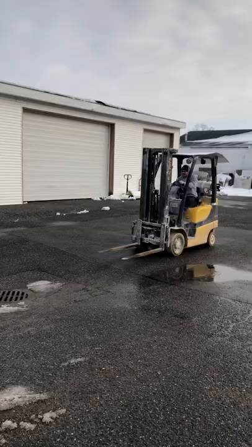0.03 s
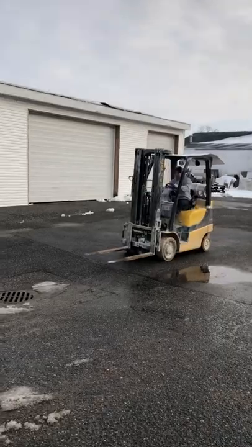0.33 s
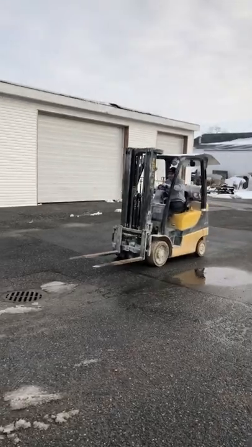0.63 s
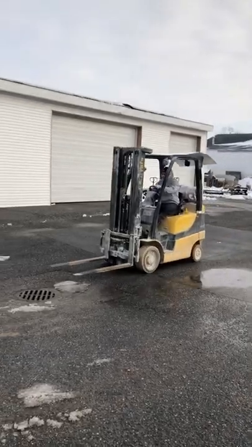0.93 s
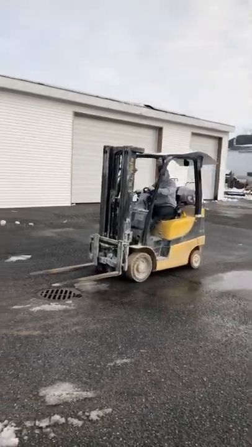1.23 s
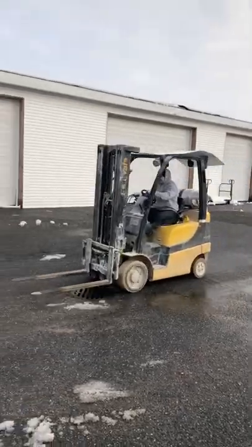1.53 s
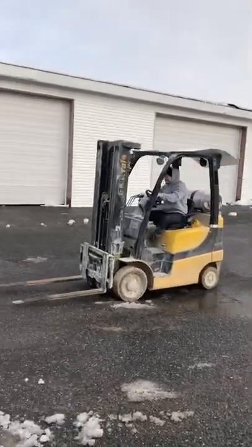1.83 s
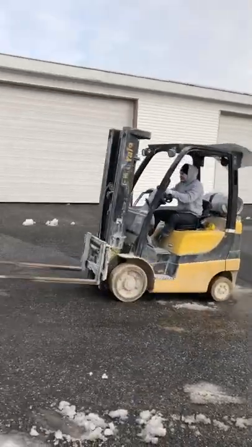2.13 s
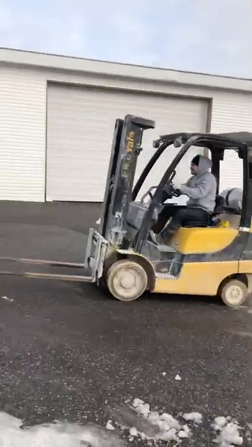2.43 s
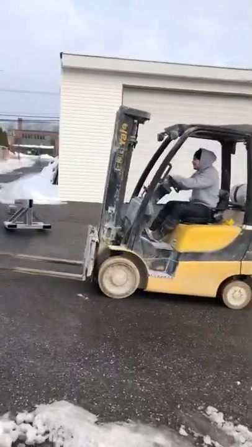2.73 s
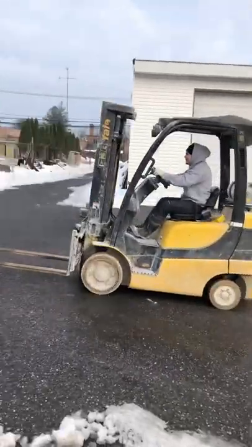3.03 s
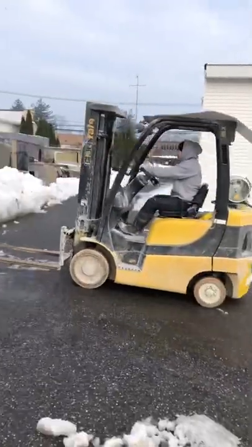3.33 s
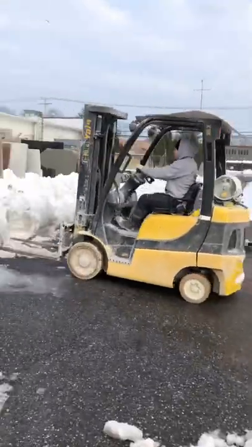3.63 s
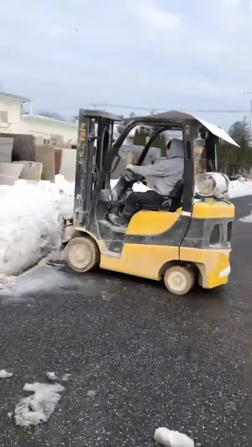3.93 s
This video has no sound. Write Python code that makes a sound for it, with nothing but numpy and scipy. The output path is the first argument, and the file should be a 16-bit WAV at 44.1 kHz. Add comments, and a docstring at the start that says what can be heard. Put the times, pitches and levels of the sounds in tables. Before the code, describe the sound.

A forklift pulls away outdoors with a low engine drone and a faint rising whine in the first second. The engine climbs in pitch and grows louder over a soft hiss of wet tyres. From about 1.4 to 3 seconds, steel forks and chains clatter and clink loudly. It passes close, revving higher around 3.5 seconds, with the metal still jiggling lightly until 4 seconds.

```python
"""A gas forklift pulls away across a paved yard, its transmission whining faintly, tyres hissing on wet grit.
The engine speeds up and grows louder: the exhaust drones at the firing rate, the belt-driven fan hums
and rushes. From about 1.4 s to 3 s the hard tyres cross a drain and rough asphalt; forks, carriage and
mast chains clatter, echoing off ground and shed wall. It passes close by, revving, steel still jiggling."""
import sys
import numpy as np
from scipy import signal
from scipy.fft import rfft, irfft
from scipy.io import wavfile

SR = 44100
rng = np.random.default_rng(int(sys.argv[2]) if len(sys.argv) > 2 else 0)


def log_audio(samples):
    """Write samples as a 16-bit WAV file to the path given in sys.argv[1]."""
    # one column per channel
    frames = np.atleast_2d(samples).T
    # limit to full scale, then quantise
    limited = np.clip(frames, -1, 1)
    pcm = np.round(limited * 32767).astype(np.int16)
    wavfile.write(sys.argv[1], SR, pcm)


N = 176400
TIME = np.arange(N) / SR


def from_db(db):
    """Decibels to gain."""
    return 10 ** (np.asarray(db) / 20)


def rms_one(x):
    """Scale to unit rms."""
    return x / np.sqrt(np.mean(x ** 2) + 1e-20)


def in_time(rows, column=1):
    """One column of a curve at every sample."""
    rows = np.array(rows)
    return np.interp(TIME, rows[:, 0], rows[:, column])


def drift(rate_hz):
    """Slow random wander, rms 1."""
    step, settle = 40, 2000
    pole = np.exp(-2 * np.pi * step * rate_hz / SR)
    noise = rng.standard_normal(N // step + settle + 2)
    slow = signal.lfilter([1], [1, -2 * pole, pole * pole], noise)[settle:]
    return np.interp(np.arange(N) / step, np.arange(len(slow)), rms_one(slow))


def colour(x, spectrum):
    """Shape a spectrum, keeping the power of white input."""
    hz, db = np.transpose(spectrum)
    bin_hz = np.maximum(np.arange(N + 1) * SR / (2 * N), 1)
    rolloff = np.minimum(bin_hz / hz[0], 1) * np.minimum(hz[-1] / bin_hz, 1)
    gain = from_db(np.interp(np.log(bin_hz), np.log(hz), db)) * rolloff ** 2
    return irfft(rfft(x, 2 * N) * rms_one(gain))[:N]


def contacts(per_s, spread_db):
    """Random clicks of uneven size, rms 1."""
    sizes = from_db(spread_db * np.minimum(rng.exponential(1, N), 4))
    signs = rng.choice([-1, 1], N)
    return rms_one(sizes * signs * (rng.random(N) < per_s / SR))


def ring(x, hz, t60_s):
    """One mode, keeping the power of white input."""
    radius = np.exp(-np.log(1000) / (t60_s * SR))
    angle = 2 * np.pi * hz / SR
    gain = np.sin(angle) * np.sqrt(2 * (1 - radius * radius))
    return signal.lfilter([0, gain], [1, -2 * radius * np.cos(angle), radius * radius], x + 1e-18)


def tone(phase, level_db, flutter_db, wobble_rad):
    """Machine tone of given rms level, fluttering in level and phase."""
    amplitude = np.sqrt(2) * from_db(level_db + flutter_db * drift(14.3))
    return amplitude * np.cos(phase + wobble_rad * drift(10.3))


def bursts(rows, fade_s):
    """Envelope of instant onsets and exponential fades."""
    return sum(from_db(db) * (TIME >= start) * np.exp(-np.abs(TIME - start) / fade_s)
               for start, db in rows)


# delay_s, level_db
YARD_ECHOES = [(.007, -23.5), (.047, -22.5)]

def yard(x, cutoff_hz=5000):
    """Direct sound plus dull echoes off ground and shed."""
    dull = signal.sosfilt(signal.butter(1, cutoff_hz, fs=SR, output="sos"), x)
    return x + sum(from_db(db) * np.interp(TIME - delay, TIME, dull, left=0) for delay, db in YARD_ECHOES)


# time_s, level_db
WHISTLE_LEVEL = [(0, -56), (.4, -50), (.9, -60)]

def whistle():
    """Faint airy whistle while pulling away."""
    return from_db(in_time(WHISTLE_LEVEL)) * ring(rng.standard_normal(N), hz=2170, t60_s=.018)


# time_s, pitch_hz, level_db
GEAR_WHINE = [(0, 230.7, -43), (.25, 283, -47), (.5, 333.7, -38.5), (.9, 391, -48.5), (1.3, 418, -70)]

def transmission():
    """Gear whine rising with road speed."""
    phase = 2 * np.pi * np.cumsum(in_time(GEAR_WHINE)) / SR
    return tone(phase, in_time(GEAR_WHINE, column=2), flutter_db=2, wobble_rad=.4)


# start_s, level_db
GRIT_SNAP = [(.501, -28)]
# freq_hz, gain_db
SNAP_SPECTRUM = [(3500, -18), (6500, 3), (8500, -2), (14000, -16)]

def grit_snap():
    """Grit crushed under a tyre: one tiny bright burst."""
    return colour(bursts(GRIT_SNAP, fade_s=0.0023) * rng.standard_normal(N), SNAP_SPECTRUM)


# time_s, level_db
HISS_LEVEL = [(0, -41.5), (.5, -39), (1.1, -37), (1.5, -34), (2.2, -33), (2.9, -31.5), (3.35, -30),
              (3.7, -29), (4, -34.5)]
# freq_hz, gain_db
HISS_SPECTRUM = [(900, -14), (2000, 0.5), (3200, -1), (5000, -1.5), (7500, -1), (10000, -6), (15500, -11)]

def hiss(firing_phase, throb=0.17, grit=0.77):
    """Engine bay and tyres on wet asphalt hiss; wet grit crackles."""
    smooth = rng.standard_normal(N) * (1 + throb * np.cos(firing_phase))
    crackle = grit * contacts(per_s=3000, spread_db=1.5)
    return colour(rms_one(smooth + crackle), HISS_SPECTRUM) * from_db(in_time(HISS_LEVEL))


# time_s, level_db
RUSH_LEVEL = [(0, -35), (.5, -35.5), (1, -31), (1.4, -30.5), (2, -22), (2.8, -23.5), (3.35, -25),
              (3.7, -21.5), (4, -24)]
# freq_hz, gain_db
RUSH_SPECTRUM = [(60, -24), (130, 0.5), (200, 3), (340, -3), (540, 2), (800, -0.5), (950, -2.5), (1280, -1),
                 (2000, -13), (4000, -37), (16000, -41)]

def rush(firing_phase, throb=0.078, flicker_db=1.3):
    """Engine and fan noise, throbbing with each firing."""
    air = rng.standard_normal(N) * (1 + throb * np.cos(firing_phase))
    return colour(air, RUSH_SPECTRUM) * from_db(in_time(RUSH_LEVEL) + flicker_db * drift(23))


# time_s, level_db
BLADE_LEVEL = [(0, -38), (.5, -32.5), (1, -30.5), (1.5, -25.5), (1.9, -35), (2.3, -24.5), (3.1, -24.5),
               (3.7, -21), (4, -20)]
# blade_rate_multiple, offset_db
BLADE_HARMONICS = [(2, -16), (3, -15)]

def fan(firing_phase, blades_per_firing=23 / 8):
    """Blade tone and harmonics, out of step with the firings because of the belt."""
    phase = blades_per_firing * firing_phase
    level_db = in_time(BLADE_LEVEL)
    hum = tone(phase, level_db, flutter_db=.8, wobble_rad=.1)
    return hum + sum(tone(multiple * phase, level_db + offset_db, flutter_db=2, wobble_rad=0.74)
                     for multiple, offset_db in BLADE_HARMONICS)


# Exhaust harmonics 1, 2, 4: time_s, level_db
DRONE_LEVEL = [(0, -37.5), (.48, -34), (.6, -39), (.8, -31), (1.1, -23.5), (1.56, -21), (1.7, -33.5),
               (2.05, -20.5), (2.5, -19), (3.3, -18), (3.65, -20), (4, -23.5)]
OCTAVE_LEVEL = [(0, -41), (.75, -33), (1.1, -46), (1.5, -37.5), (1.9, -30), (3.1, -34), (3.55, -24.5),
                (4, -57)]
FOURTH_LEVEL = [(0, -50), (.85, -38), (1.2, -46.5)]
# firing_rate_multiple, level_re_rush_db
WEAK_ORDERS = [(3, -12), (7, -23), (8, -14)]

def exhaust(firing_phase):
    """Firing pulses make a drone, its octave and rougher upper orders."""
    drone = tone(firing_phase, in_time(DRONE_LEVEL), flutter_db=1, wobble_rad=.04)
    octave = tone(2 * firing_phase, in_time(OCTAVE_LEVEL), flutter_db=2, wobble_rad=0.28)
    fourth = tone(4 * firing_phase, in_time(FOURTH_LEVEL), flutter_db=1, wobble_rad=0.71)
    rush_db = in_time(RUSH_LEVEL)
    weak = sum(tone(multiple * firing_phase, rush_db + db, flutter_db=4, wobble_rad=0.68)
               for multiple, db in WEAK_ORDERS)
    return drone + octave + fourth + weak


KNOCK_RISE_S, KNOCK_FADE_S, CONTACTS_PER_S = 0.00083, 0.019, 1500
# start_s, pitch_hz, level_db, t60_s
STEEL_PINGS = [(1.745, 4580, -10, 0.049), (1.746, 9350, -20.5, 0.16), (2.221, 3772, -25, 0.75),
               (2.358, 6970, -20, 0.11), (2.506, 1798, -13, 0.34), (2.641, 5280, -20, 0.16),
               (2.931, 3224, -22, 0.63)]

def pings():
    """Cleanly struck chain links and fork tips ring out."""
    out = np.zeros(N)
    for start, hz, db, t60_s in STEEL_PINGS:
        age = np.maximum(TIME - start, 0)
        envelope = (1 - np.exp(-age / KNOCK_RISE_S)) * np.exp(-np.log(1000) * age / t60_s)
        out += from_db(db) * envelope * np.sin(2 * np.pi * hz * age)
    return out


# start_s, level_db
FORK_SLAMS = [(1.667, -11), (1.745, -11), (1.793, -14.5), (2.236, -19), (2.506, -11)]

def fork_slams(clink_db=-2):
    """A fork hits its stop with dry, hard cracks."""
    force = bursts(FORK_SLAMS, fade_s=0.0055)
    clank = colour(force * rng.standard_normal(N), CLANK_SPECTRUM)
    clink = colour(force * rng.standard_normal(N), CLINK_SPECTRUM)
    return clank + from_db(clink_db) * clink


def loose_parts(starts_s, levels_db, range_hz, t60_s, count):
    """Each knock rings a few parts at random pitches, the higher the weaker."""
    out, age = np.zeros(N), TIME[:SR // 4]
    for start, db in zip(starts_s, levels_db):
        hz = np.exp(rng.uniform(*np.log(range_hz), (count, 1)))
        lag_s = rng.uniform(0, KNOCK_FADE_S / 2, (count, 1))
        since = np.maximum(age - lag_s, 0)
        envelope = np.sqrt(range_hz[0] / hz) * np.exp(-np.log(1000) * since / t60_s)
        rings = envelope * np.sin(2 * np.pi * hz * since)
        i = int(start * SR)
        out[i:i + len(age)] += from_db(db) * rings.sum(axis=0)[:N - i]
    return out


def brackets_and_chains():
    """Carriage brackets clang and chain links jingle at each fork knock."""
    starts_s, level_db, _, clink_offset_db = np.transpose(FORK_KNOCKS)
    brackets = loose_parts(starts_s, level_db - 12, range_hz=(1147, 3022), t60_s=.11, count=4)
    links = loose_parts(starts_s, level_db + clink_offset_db - 7, range_hz=(2540, 12850), t60_s=.15, count=8)
    return brackets + links


def rattle(force, t60_s=0.031, tail_db=-1.5):
    """Uneven contacts, then the dense after-ring of many small parts."""
    pole = np.exp(-2 * np.log(1000) / (t60_s * SR))
    tail = np.sqrt(signal.lfilter([1 - pole], [1, -pole], force ** 2))
    hits = force * contacts(CONTACTS_PER_S, spread_db=1)
    return hits + from_db(tail_db) * tail * rng.standard_normal(N)


def struck_mode(force, hz, t60_s, uneven_db=4, pitch_spread=0.0212):
    """Three like parts, unevenly struck, ring at slightly different pitches."""
    detune = pitch_spread * (np.arange(3) - 1 + rng.uniform(-0.63, 0.74, 3)) / 2
    out = np.zeros(N)
    for part_hz in hz * (1 + detune):
        hits = force * from_db(uneven_db * drift(13)) * contacts(CONTACTS_PER_S, spread_db=4.5)
        out += ring(hits, part_hz, t60_s)
    return out / np.sqrt(3)


# time_s, level_db
JIGGLE_LEVEL = [(0, -59), (1.3, -44), (1.55, -28.5), (1.7, -23.5), (1.92, -25.5), (2.1, -20.5),
                (2.6, -20.5), (2.8, -27), (3.3, -29), (3.7, -26), (4, -26)]

def shaking(starts_s, levels_db, jiggle_db):
    """Force envelope: knocks swell and fade over the steady jiggling of chains and forks."""
    power = from_db(in_time(JIGGLE_LEVEL) + jiggle_db) ** 2
    age = TIME[:SR // 4]
    knock = (1 - np.exp(-age / KNOCK_RISE_S)) * np.exp(-age / KNOCK_FADE_S)
    for start, db in zip(starts_s, levels_db):
        i = int(start * SR)
        power[i:i + len(age)] += (from_db(db) * knock[:N - i]) ** 2
    return np.sqrt(power)


# start_s, level_db, thud_offset_db, clink_offset_db
FORK_KNOCKS = [(1.449, -16.5, -8, -28), (1.484, -17.5, 1, -13.5), (1.5947, -11, -19, -18),
               (1.6425, -9, -10.5, -24), (1.6667, -5, -17, -15), (1.6863, -9, -11.5, -12.5),
               (1.701, -7.5, -24, -12), (1.715, -6.5, -6, -19), (1.741, -11.5, -6.5, -13),
               (1.7938, -9, -18, -14), (1.8491, -9.5, -17, -7.5), (1.867, -21, 5, 1),
               (1.9553, -7, -7.5, -15.5), (2.0224, -8.5, -9, -34), (2.051, -6.5, -13, -17),
               (2.0724, -9.5, 0, -8.5), (2.09, -10.5, -20, -8), (2.127, -11, -2, -8),
               (2.166, -6.5, -9.5, -18), (2.2164, -10, -25, -7.5), (2.2346, -21, 3, 6),
               (2.2953, -8.5, -19, -14.5), (2.3331, -10.5, -10, -10.5), (2.358, -6, -26, -10.5),
               (2.3714, -14, -19, -6.5), (2.4054, -14.5, 2.5, -8), (2.4376, -13, 1, -7.5),
               (2.503, -11, -19, -22), (2.582, -7, -6, -14.5), (2.605, -15, 4.5, -6),
               (2.6415, -8.5, -3.5, -12), (2.7777, -12, -5, -8), (2.9275, -14.5, -5.5, -12.5),
               (3, -15.5, -9, -7.5)]
# Steelwork registers: freq_hz, gain_db
THUD_SPECTRUM = [(30, -21), (150, -10), (340, -10), (490, 2), (640, -4.5), (850, -12.5), (1500, -25)]
CLANK_SPECTRUM = [(500, -20), (900, -9), (1200, 2), (1900, 1), (2600, -2.5), (3600, -10), (7000, -29)]
CLINK_SPECTRUM = [(1800, -46), (3400, 4.5), (4600, 1.5), (7500, -2), (10000, -12.5), (13500, -12.5),
                  (16000, -27)]
# Forks and mast: pitch_hz, level_db, t60_s
STEEL_MODES = [(494, -12, 0.59), (627, -9.5, 0.22), (981, -14, 0.6), (1185, -11, 0.14), (1800, -15, 0.3),
               (3227, -9, 0.23), (3767, -10.5, 0.39), (4440, -10, 0.35), (5264, -8, 0.22), (6950, -9, 0.13),
               (9140, -11, 0.076), (13800, -21, .1)]

def forks(thud_db=-2.5, clank_db=-8, clink_db=-2, ring_db=-2, clink_above_hz=3000):
    """Forks knock in the carriage: steel contacts sound three registers and ring the modes."""
    starts_s, level_db, thud_offset_db, clink_offset_db = np.transpose(FORK_KNOCKS)
    thud = shaking(starts_s, level_db + thud_offset_db + thud_db, jiggle_db=-5.5)
    clank = shaking(starts_s, level_db + clank_db, jiggle_db=-2.5)
    clink = shaking(starts_s, level_db + clink_offset_db + clink_db, jiggle_db=-9.5)
    registers = (thud, THUD_SPECTRUM), (clank, CLANK_SPECTRUM), (clink, CLINK_SPECTRUM)
    body = sum(colour(rattle(force), spectrum) for force, spectrum in registers)
    rings = sum(from_db(db) * struck_mode(clink if hz > clink_above_hz else clank, hz, t60_s)
                for hz, db, t60_s in STEEL_MODES)
    return body + from_db(ring_db) * rings


# time_s, firing_rate_hz
ENGINE_SPEED = [(0, 60.3), (.18, 60.7), (.42, 57.2), (.78, 65.8), (1.02, 68), (1.5, 73.1), (1.72, 79),
                (2.17, 85.2), (2.45, 84), (2.65, 84.8), (3.01, 83.8), (3.23, 79.6), (3.45, 85.4),
                (3.64, 93), (4, 93.3)]

def scene():
    """Engine, tyres and echoing clatter of the passing forklift, mono."""
    phase = 2 * np.pi * np.cumsum(in_time(ENGINE_SPEED)) / SR
    engine = exhaust(phase) + fan(phase) + transmission() + whistle() + rush(phase)
    tyres = hiss(phase) + grit_snap()
    clatter = forks() + fork_slams() + brackets_and_chains() + pings()
    return (engine + tyres + yard(clatter))[None]


def record(dry, ceiling=0.79, start_s=.036, cutoff_hz=15700):
    """Rounded peaks, a brief opening silence, steep low-pass."""
    rounded = dry / (1 + (dry / ceiling) ** 4) ** (1 / 4)
    lowpass = signal.ellip(12, .1, 80, cutoff_hz, fs=SR, output="sos")
    return signal.sosfilt(lowpass, rounded * (TIME >= start_s))


dry = scene()
out = record(dry)
log_audio(out)
```